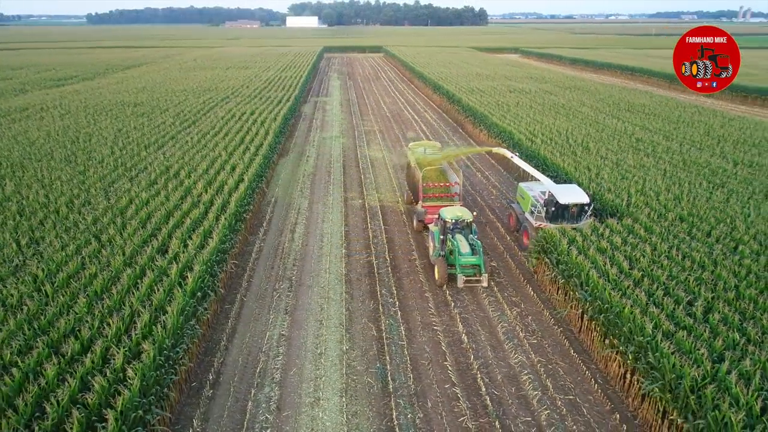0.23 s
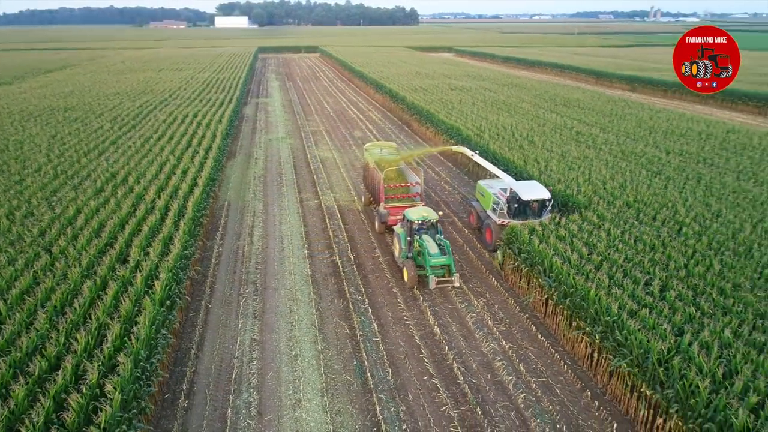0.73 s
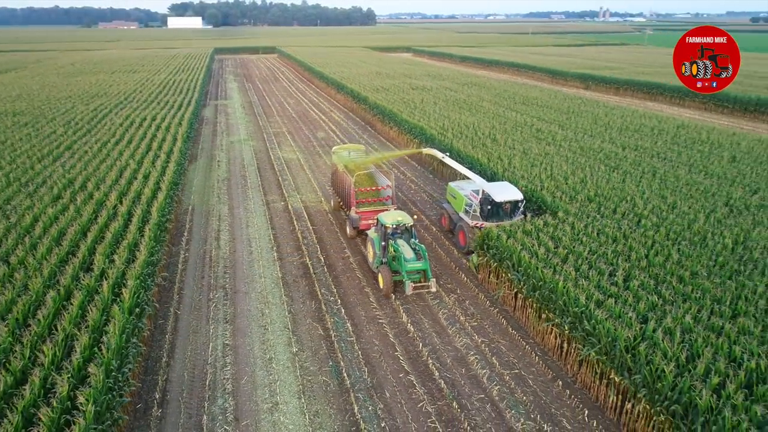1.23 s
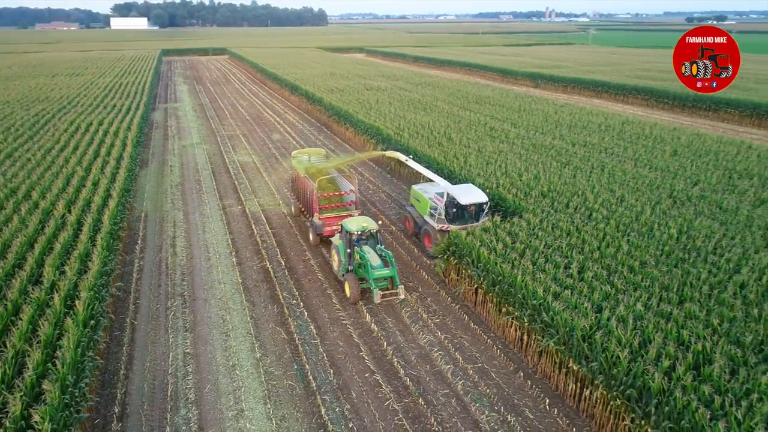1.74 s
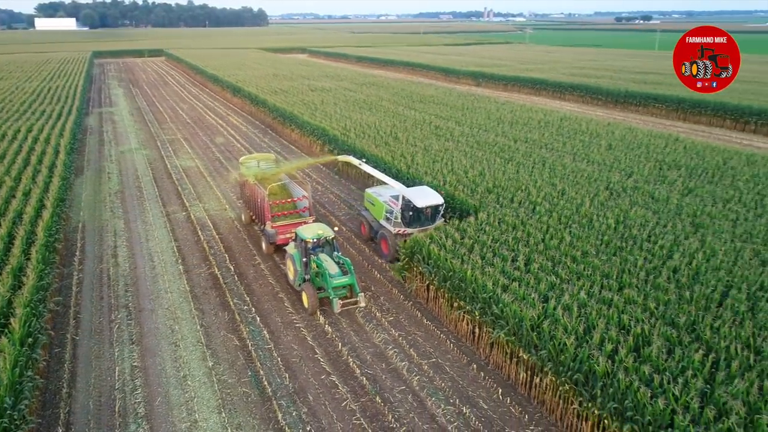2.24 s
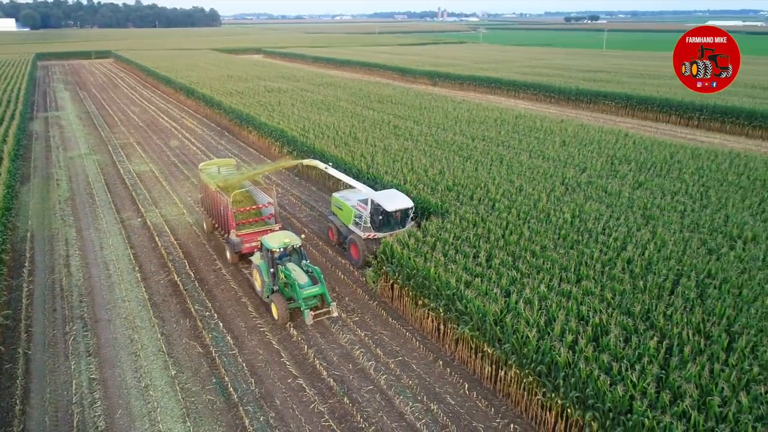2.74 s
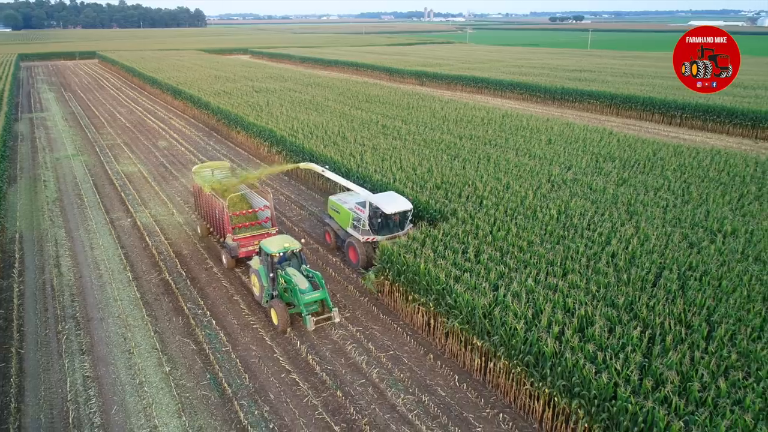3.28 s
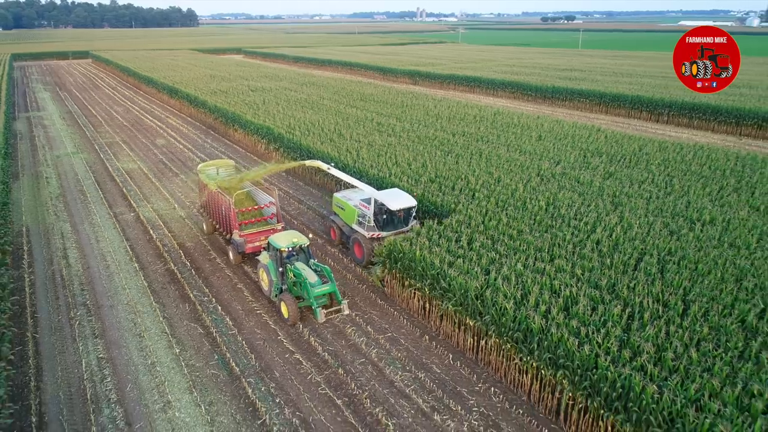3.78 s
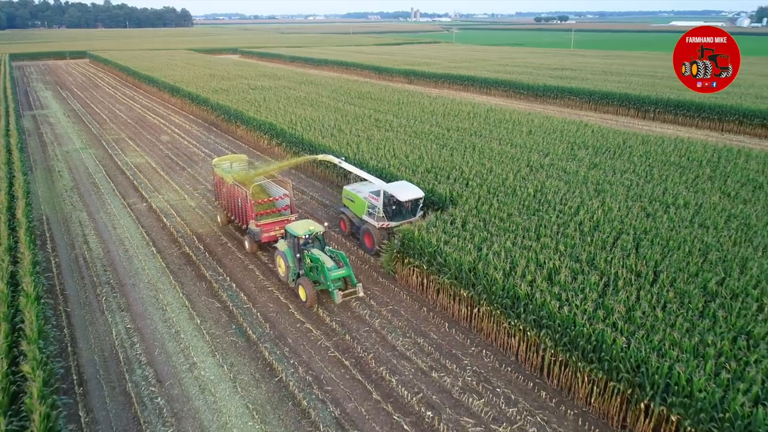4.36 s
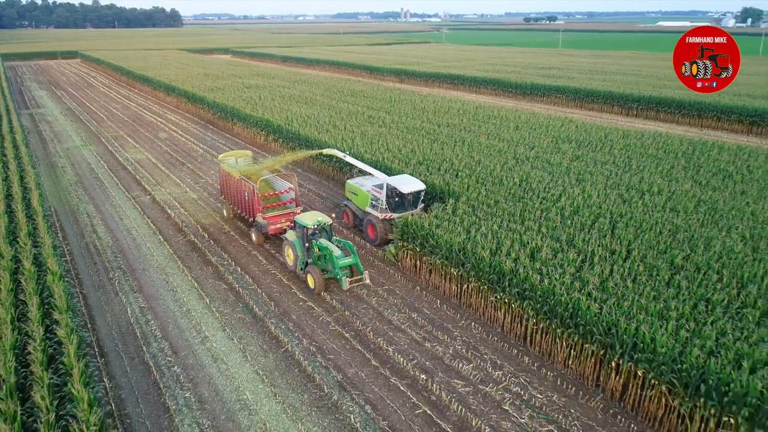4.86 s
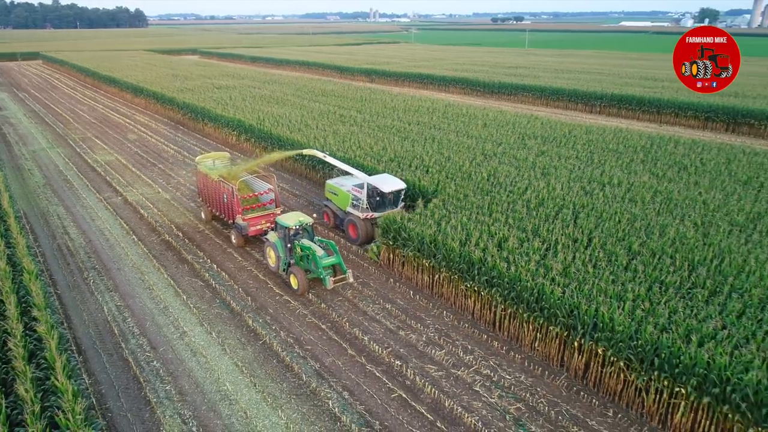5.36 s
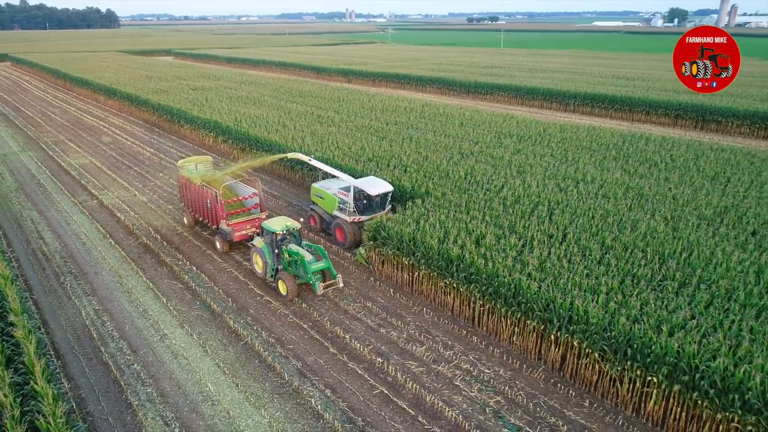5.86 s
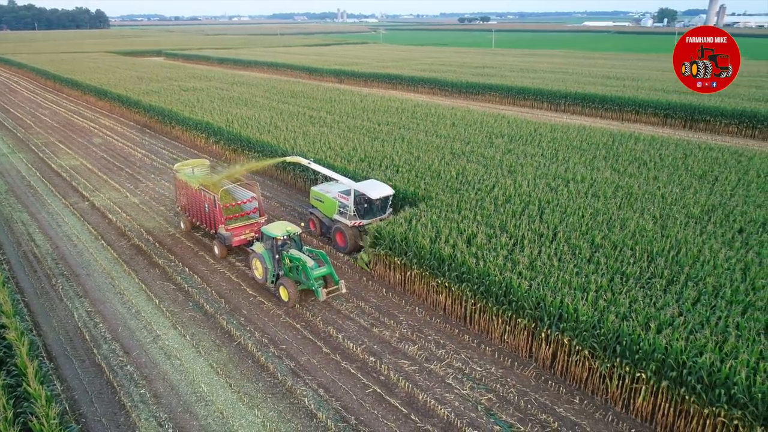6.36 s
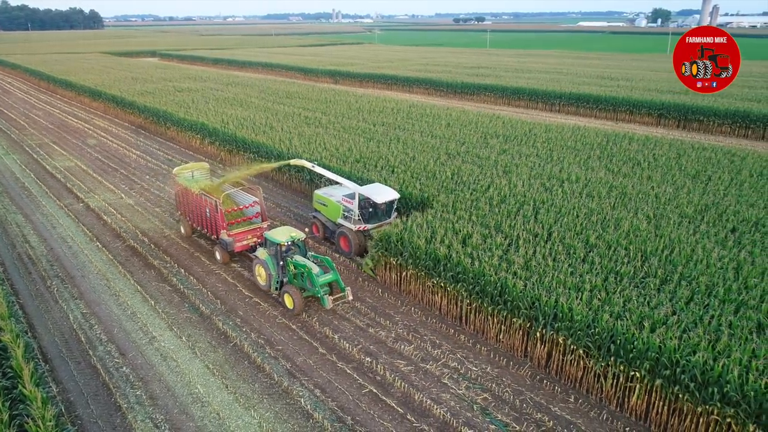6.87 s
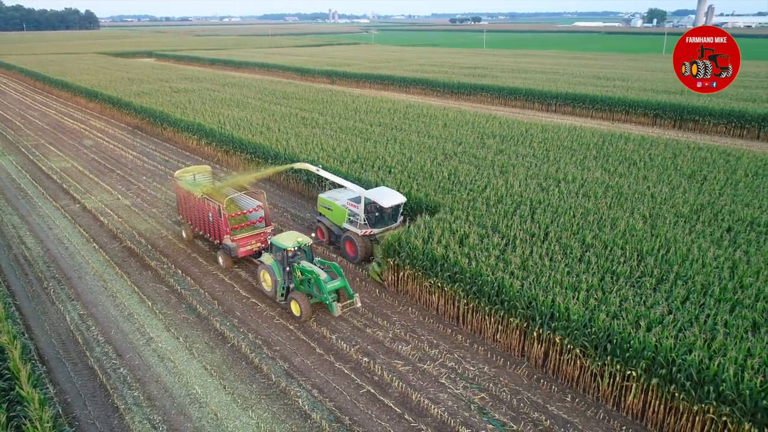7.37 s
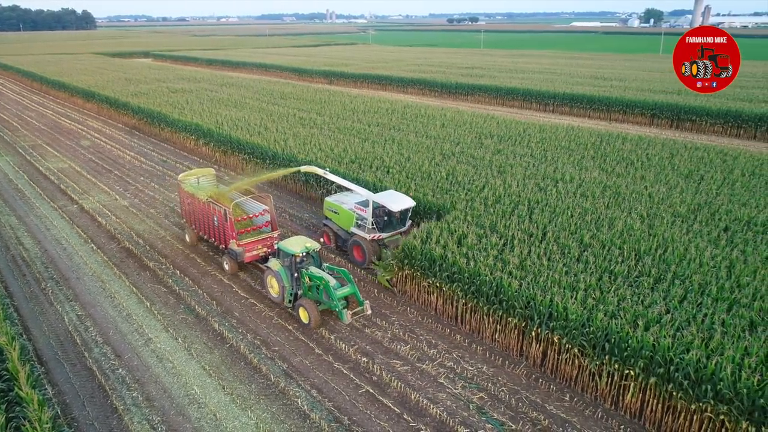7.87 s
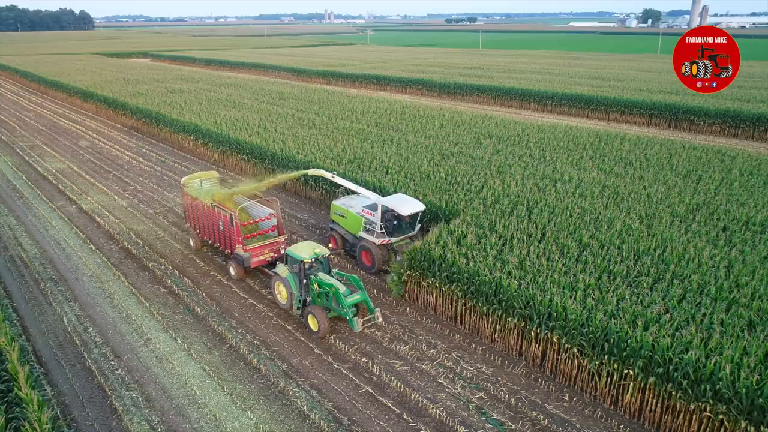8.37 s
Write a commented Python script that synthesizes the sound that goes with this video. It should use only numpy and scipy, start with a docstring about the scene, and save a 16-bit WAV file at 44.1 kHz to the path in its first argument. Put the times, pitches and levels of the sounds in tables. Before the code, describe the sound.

A forage harvester is already chopping maize in an open field and runs without a break for about eight and a half seconds. Its diesel engine drones low over a dull rumble, with humming belt drives and a knife drum hum that gently rises and falls. Chopped crop rushes continuously through the steel spout. For the first 1.5 seconds a thick patch adds a brighter, hissing spray of chips with a few small surges, fading away by about 2.5 seconds. A faint gear whine swells briefly around 1.3, 3.4 and 5.8 seconds. High above, a very faint, thin turbocharger whistle climbs over the first few seconds and then holds, inside a slight, wide hiss. The machine itself stays centred and even in loudness. Its pitch is nearly constant until about 7.3 seconds, then sags a little through to the end.

```python
"""A forage harvester chopping maize

The machine chops standing maize under steady load. Its engine, belt drives and knife drum hum
over a dull rumble, all on one shared speed that sags a little at the end. Chopped crop rushes
through the steel spout, with a brighter spray while a thick patch goes through in the first
second and a half. High above, the turbocharger whistles in a faint hiss."""
import sys
import numpy as np
from scipy import signal
from scipy.fft import rfft, irfft, next_fast_len
from scipy.io import wavfile
from scipy.ndimage import uniform_filter1d, minimum_filter1d

SR = 44100
rng = np.random.default_rng(int(sys.argv[2]) if len(sys.argv) > 2 else 0)


def waveform_to_disk(signal):
    """Save audio, clipped to [-1, 1], as 16-bit WAV at the path in sys.argv[1]."""
    frames = np.transpose(np.atleast_2d(signal))
    scaled = np.clip(frames, -1, 1) * 32767
    samples = np.round(scaled).astype(np.int16)
    wavfile.write(sys.argv[1], SR, samples)


N = 380141
TIME = np.arange(N) / SR


def from_db(db):
    """Turn decibels into a number to multiply by."""
    return 10 ** (np.asarray(db) / 20)


def rms_one(x):
    """Scale a signal so its average strength (rms) is 1."""
    return x / np.sqrt(np.mean(x ** 2) + 1e-20)


def in_time(rows):
    """Join (time, value) points with straight lines."""
    return np.interp(TIME, *np.transpose(rows))


def drift(rate):
    """A random wobble of size about 1, moving about `rate` times a second."""
    hz = np.fft.rfftfreq(4096, 1 / 400)   # 400 points a second
    slow = irfft(rfft(rng.standard_normal(4096)) / (1 + (hz / rate) ** 2))
    return rms_one(np.interp(TIME * 400, np.arange(len(slow)), slow))


def shaped(sound, colour):
    """Give a sound a colour: a table of how strong its frequencies are next to each other; rms 1."""
    size = next_fast_len(N)
    hz, db = np.transpose(colour)
    bins = np.maximum(np.fft.rfftfreq(size, 1 / SR), 1)
    gain = from_db(np.interp(np.log(bins), np.log(hz), db))
    return rms_one(irfft(rfft(sound, size) * gain, size)[:N])


def noise(colour):
    """Steady noise with a given colour."""
    return shaped(rng.standard_normal(N), colour)


def tone(cycles, level_db, waver_db, slip, rate):
    """One note of a spinning part; uneven load shakes its level and its timing (slip, in radians)."""
    phase = 2 * np.pi * (cycles + rng.random()) + slip * drift(rate)
    return np.sqrt(2) * from_db(level_db + waver_db * drift(rate)) * np.sin(phase)


def breathy(cycles, width_hz):
    """A breathy note: a narrow band of noise around a moving pitch."""
    phase = 2 * np.pi * cycles
    return drift(width_hz) * np.sin(phase) + drift(width_hz) * np.cos(phase)


def swells(rows):
    """Rounded rises and falls of level, in dB."""
    return sum(db * np.exp(-(2 * (TIME - peak_s) / length_s) ** 2) for peak_s, length_s, db in rows)


# Colour of the rumble: f/Hz, level/dB
RUMBLE_COLOUR = [(10, -25), (20, -21), (32, -12), (48, 1), (62, -1.5), (80, -2.5), (105, 1.5), (150, -2.5),
                 (210, -1), (265, -2.5), (290, -7.5), (315, -13.5), (340, -21.5), (380, -34), (600, -52)]

def rumble():
    """A dull, steady noise lies under the whole machine."""
    return from_db(-21) * noise(RUMBLE_COLOUR)


# Colour of the shaking panels: f/Hz, level/dB
PANEL_COLOUR = [(280, -40), (365, -10), (420, -2.5), (485, -1.5), (540, -11.5), (595, -12), (645, -2),
                (680, -6.5), (730, -2.5), (860, 0.5), (960, -2.5), (1010, -7.5), (1110, -21), (1500, -48)]

def housing():
    """The chopping shakes the panels around the drum."""
    return from_db(-36 + 0.85 * drift(4.9)) * noise(PANEL_COLOUR)


# Engine notes: multiple of the lowest pitch, level/dB, gain per extra drum turn a second/dB,
# gain in thick crop/dB
ENGINE_NOTES = [(1, -22.5, 6.5, -1.5), (2, -22, 0, -1.5), (3, -24.5, 1.5, -10.5), (4, -36.5, 7, 6.5),
                (6, -40, -1, -5), (8, -53, -1, 0)]

def engine(turns, extra_speed, thick):
    """The diesel drones low; its colour shifts with speed and load."""
    cycles = 2.526 * turns   # geared to the drum
    return sum(tone(round(k) * cycles, db + speed_db * extra_speed + load_db * thick,
                    waver_db=1.7, slip=0.039, rate=1.4)
               for k, db, speed_db, load_db in ENGINE_NOTES)


# Belt-driven shafts: cycles per drum turn, level/dB
SHAFT_NOTES = [(2.26, -37), (2.81, -37), (3.36, -40), (5.9, -32.5), (6.82, -29.5), (8.43, -34.5),
               (9.1, -39), (16.32, -41.5), (32.63, -57), (43.67, -55), (65.61, -57)]

def drives(turns, extra_speed, thick, paddles=8):
    """Shafts hum, feed rollers strain in thick crop, and the blower grows louder with speed."""
    shafts = sum(tone(ratio * turns, db, waver_db=3.0, slip=0.22, rate=1.35)
                 for ratio, db in SHAFT_NOTES)
    rollers = tone(5.62 * turns, -29 + 5.5 * thick, waver_db=-1.3, slip=0.13, rate=2.1)
    blower = tone(paddles * turns, -24 + 2.5 * extra_speed, waver_db=0.4, slip=0.12, rate=5.7)
    return shafts + rollers + blower


# Moments when the gear whine swells: t/s, length/s, boost/dB
GEAR_SWELLS = [(1.34, 0.26, 5.5), (3.35, 0.38, 5.5), (5.75, 0.68, 3.5)]

def gears(turns, extra_speed, teeth=131):
    """Gear teeth meet in a whine that grows louder with speed."""
    level_db = -43 + 7 * extra_speed + swells(GEAR_SWELLS)
    return from_db(level_db) * breathy(teeth * turns, width_hz=13.4)


# Loudness of the knife hum: t/s, level/dB
KNIFE_LEVELS = [(0, -21.5), (0.7, -22.5), (1.25, -28.4), (1.8, -25.5), (3.2, -23), (4.7, -26.5),
                (5.65, -21.5), (6.6, -27.1), (8.62, -23.5)]
# Higher knife notes: multiple of the hum's pitch, level/dB, loss far from working speed/dB,
# gain in thick crop/dB
KNIFE_NOTES = [(2, -46.5, 1, 4.5), (3, -36.5, 14, -1.5), (4, -51, -5, -9)]

def knives(turns, extra_speed, thick, blades=12):
    """Each knife cuts a slice, making a hum whose higher notes ring the housing at working speed."""
    cuts = blades * turns
    hum = tone(cuts, in_time(KNIFE_LEVELS), waver_db=1.1, slip=0.056, rate=6.2)
    off_speed = extra_speed ** 2 / (extra_speed ** 2 + 0.4 ** 2)   # one half at 0.4 turns a second off
    return hum + sum(tone(round(k) * cuts, db - loss_db * off_speed + load_db * thick,
                          waver_db=1.85, slip=0.25, rate=9.5)
                     for k, db, loss_db, load_db in KNIFE_NOTES)


def chip_hits(colour, per_s, clump_db, clump_rate):
    """Countless chips hit the steel spout, arriving in clumps."""
    hits = (rng.random(N) < per_s / SR) * rng.standard_normal(N)
    return shaped(hits, colour) * from_db(clump_db * drift(clump_rate))


# Colour of the crop rushing through the spout: f/Hz, level/dB
RUSH_COLOUR = [(900, -47), (1130, -14), (1280, -3.5), (1520, 0), (2000, -1), (2600, -3), (3200, -6.5),
               (4500, -9.5), (5800, -8), (7100, -6), (8000, -15.5), (9000, -27), (11000, -41), (16000, -60)]

def crop_rush(extra_speed):
    """The spout blows harder with speed, and its rush pulses as stalks are fed in."""
    feed_hz = 7.2 + 0.68 * drift(0.9)
    pulse = np.sin(2 * np.pi * np.cumsum(feed_hz) / SR)
    level_db = -29 + 0.5 * extra_speed + 0.31 * pulse
    return from_db(level_db) * chip_hits(RUSH_COLOUR, per_s=36000, clump_db=0.61, clump_rate=13)


# Colour of the spraying chips: f/Hz, level/dB
CHIP_COLOUR = [(1100, -30), (1500, -8), (2200, -7), (3000, -2.5), (4500, -2.5), (6000, -2), (7200, -3.5),
               (8000, -13), (8800, -17), (9300, -28.5), (10500, -33), (16000, -52)]
# Wads of crop bursting from the spout: t/s, length/s, boost/dB
CROP_WADS = [(.22, .08, 2), (.36, 0.15, 1.5), (.62, 0.16, 3.5), (.82, .08, 2), (1.24, 0.065, 1.5)]

def crop_spray(thick, hold_s=1, fade_db_per_s=5.5):
    """Thick crop throws a bright spray that holds, then fades and dulls; each wad lifts it briefly."""
    fade_db = fade_db_per_s * np.maximum(TIME - hold_s, 0)
    change_db = swells(CROP_WADS) - fade_db + 10 * np.log10(thick + 1e-9)
    chips = chip_hits(CHIP_COLOUR, per_s=24000, clump_db=1.1, clump_rate=40)
    body = signal.sosfiltfilt(signal.butter(2, 5500, fs=SR, output="sos"), chips)
    treble = from_db(0.7 * change_db) * (chips - body)   # fast chips ring brighter
    return from_db(-26 + change_db) * (body + treble)


# Colour of the hiss that is the same in both ears: f/Hz, level/dB
HISS_MIDDLE = [(6000, -15), (9000, -2), (10500, 0), (11500, -2), (12300, 3.5), (13100, 2), (13900, -3),
               (14800, -4), (15400, -2), (16000, -3)]
# Colour of the hiss that is opposite in the two ears: f/Hz, level/dB
HISS_SIDES = [(10500, -90), (11100, -28), (11800, -1), (12400, 2), (13500, -1.5), (14500, -2), (15400, 1),
              (16000, 0)]

def high_hiss():
    """A faint, very high hiss spreads wide between the ears."""
    middle = from_db(-54.8) * noise(HISS_MIDDLE)
    sides = from_db(-55) * noise(HISS_SIDES)
    return np.array([middle + sides, middle - sides])


def turbocharger(start_hz=10100, top_hz=10885, spin_up_s=1.15, top_db=-61, rise_db=19):
    """The turbocharger spins up, so its thin whistle climbs and grows louder."""
    still_to_go = np.exp(-TIME / spin_up_s)
    hz = top_hz + (start_hz - top_hz) * still_to_go
    return from_db(top_db - rise_db * still_to_go) * breathy(np.cumsum(hz) / SR, width_hz=70)


# How fast the knife drum spins: t/s, speed/(turns a second)
DRUM_SPEED = [(0.0, 19.8), (0.25, 19.67), (1.05, 20.03), (1.4, 20.13), (2.2, 19.68), (2.6, 19.74),
              (3.45, 19.64), (4.05, 19.92), (4.6, 19.42), (5.3, 19.81), (5.6, 19.87), (6.4, 19.6),
              (7.3, 19.48), (7.7, 19.09), (8.62, 18.73)]

def scene(working_speed=19.74, thick_until_s=1.88, thinning_s=0.23):
    """Drum speed and crop thickness drive the machine, heard in the open air."""
    speed = in_time(DRUM_SPEED)
    turns = np.cumsum(speed) / SR   # drum turns so far
    extra_speed = speed - working_speed
    thick = 1 / (1 + np.exp((TIME - thick_until_s) / thinning_s))   # 1 in the thick patch, 0 after it
    machine = rumble() + housing() + engine(turns, extra_speed, thick)
    machine += drives(turns, extra_speed, thick) + gears(turns, extra_speed)
    chopping = knives(turns, extra_speed, thick) + crop_rush(extra_speed) + crop_spray(thick)
    return machine + chopping + high_hiss() + turbocharger()


def limit_bass(x, ceiling=0.46, boost_db=0.8, window=700):
    """Lift the bass a little, but turn it down smoothly when the low notes pile up."""
    bass = signal.sosfiltfilt(signal.butter(4, 400, fs=SR, output="sos"), x)
    allowed = np.minimum(from_db(boost_db), ceiling / (np.abs(bass).max(axis=0) + 1e-9))
    gain = uniform_filter1d(minimum_filter1d(allowed, window), window)
    return x + (gain - 1) * bass


def record(dry, fade_in_s=0.004, cutoff_hz=15700):
    """Fade in quickly, hold the bass in check and cut off the highest treble."""
    fade_in = np.minimum(TIME / fade_in_s, 1)
    treble_cut = signal.ellip(12, 0.1, 90, cutoff_hz, fs=SR, output="sos")
    return signal.sosfilt(treble_cut, fade_in * limit_bass(dry))


dry = scene()
out = record(dry)
waveform_to_disk(out)
```